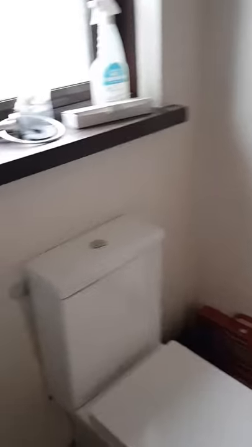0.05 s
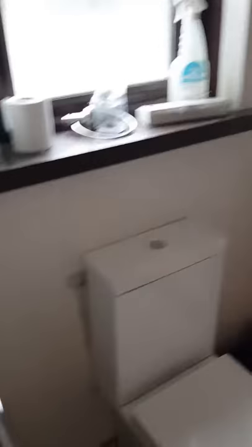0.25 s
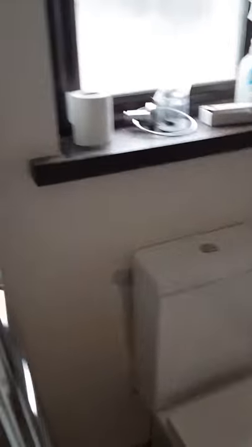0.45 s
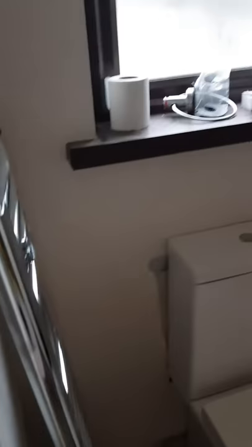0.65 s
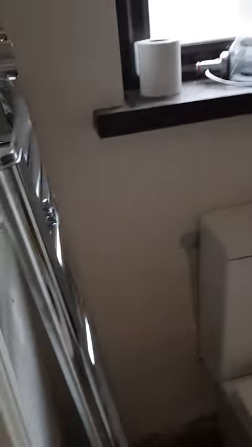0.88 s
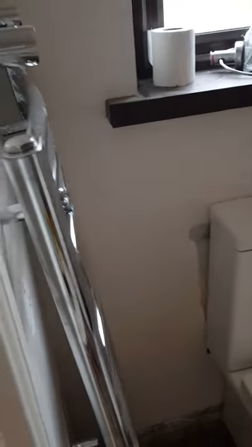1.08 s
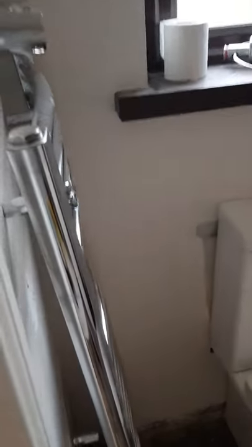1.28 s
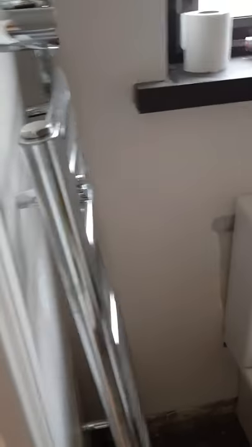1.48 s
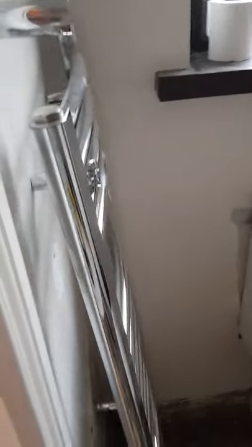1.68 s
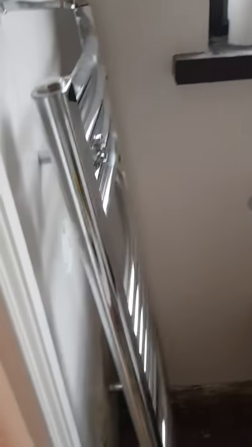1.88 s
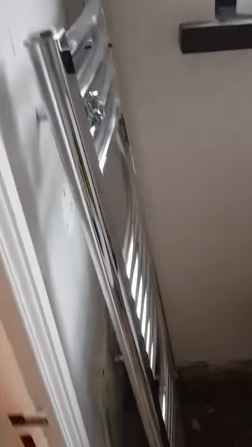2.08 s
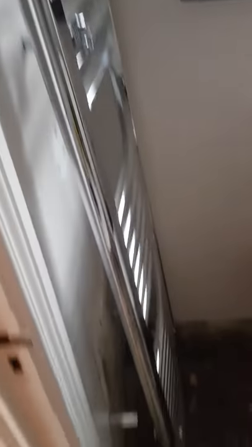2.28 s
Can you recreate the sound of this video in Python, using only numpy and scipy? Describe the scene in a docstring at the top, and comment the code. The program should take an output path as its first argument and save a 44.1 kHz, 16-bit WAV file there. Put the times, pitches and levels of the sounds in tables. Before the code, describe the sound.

Hard knocks on wood ring in a small bathroom, four and then two more.

```python
"""A small bare bathroom rings with hard knocks on wood, perhaps a door or a wall panel.
Every blow wakes the same wood resonances and wall echoes, with a fresh crack on top; standing waves
and a diffuse tail ring on for half a second. Between the knocks come light taps, soft footfalls and
the rustle of someone moving, over quiet room tone and a faint hum."""
import sys
import numpy as np
from scipy import signal
from scipy.fft import rfft, irfft
from scipy.io import wavfile
from scipy.ndimage import uniform_filter1d

SR = 44100
rng = np.random.default_rng(int(sys.argv[2]) if len(sys.argv) > 2 else 0)


def to_wav(sig):
    """Store sig (one row per channel, or 1-D mono) as 16-bit WAV at the path in sys.argv[1].

    Samples outside -1..1 are clipped; the rate is SR.
    """
    pcm = np.clip(np.atleast_2d(sig), -1, 1) * 32767
    pcm = np.round(pcm).astype(np.int16)
    wavfile.write(sys.argv[1], SR, pcm.T)  # frames by channels


N = 108045
RING = SR * 2 // 3   # samples that one hit is given to ring out
AGE = np.arange(RING) / SR   # seconds since the hit


def from_db(db):
    """Decibels to gain."""
    return 10 ** (np.asarray(db) / 20)


def decay(t60_s, age=AGE):
    """Envelope that falls 60 dB in t60_s."""
    return from_db(-60 * age / t60_s)


def attack(rise_s):
    """Envelope that rises from silence towards 1."""
    return 1 - np.exp(-AGE / rise_s)


def at_hz(points, hz):
    """Read a table on a log-frequency axis."""
    f, value = np.transpose(points)
    return np.interp(np.log(np.maximum(hz, 1)), np.log(f), value)


def pan(db):
    """Stereo gains for a level difference; positive leans left."""
    return from_db(np.array([[.5], [-.5]]) * db)


def butter(x, hz, kind, order=1):
    """Causal Butterworth filter."""
    return signal.sosfilt(signal.butter(order, hz, kind, fs=SR, output="sos"), x)


def add(out, start_s, sound):
    """Mix a sound in at a time."""
    i = max(int(start_s * SR), 0)
    out[..., i:i + sound.shape[-1]] += sound[..., :out.shape[-1] - i]


def steady(noise, window_s=.03):
    """Even out the slow swells of a noise."""
    power = uniform_filter1d(np.mean(noise ** 2, axis=0), int(window_s * SR))
    return noise * np.sqrt(power.mean() / (power + 1e-14))


def shelves(x, bass_db, treble_db, bass_hz=300, treble_hz=4500):
    """Bass and treble shelves: the weight and hardness of a contact."""
    x = x + (from_db(bass_db) - 1) * butter(x, bass_hz, "low")
    hardness = from_db(treble_db / 2)
    for _ in range(2):
        x = hardness * x + (1 - hardness) * butter(x, treble_hz, "low")
    return x


def room_noise(spectrum, size):
    """Coloured noise of rms 1 with the stereo image of the room."""
    # stereo width: (frequency [Hz], left-right correlation [-1..1])
    likeness = [(60, 0.89), (150, 0.91), (280, 0.95), (500, 0.48), (900, -0.083), (1400, -0.17),
                (2200, 0.14), (4000, -0.053), (12000, -0.095)]
    # stereo lean: (frequency [Hz], left minus right [dB])
    balance = [(125, 1.5), (250, -1.5), (500, 2.6), (1000, -3.2), (2000, 0), (4000, 4.4), (8000, 0.6),
               (13000, 0)]
    hz = np.arange(size // 2 + 1) * SR / size
    mid, side = rfft(rng.standard_normal((2, size)))
    alike = at_hz(likeness, hz)
    stereo = np.sqrt(1 + alike) * mid + np.sqrt(1 - alike) * side * [[1], [-1]]
    colour = from_db(at_hz(spectrum, hz)) * (hz > 20)
    noise = irfft(stereo * colour * pan(at_hz(balance, hz)), size)
    return noise / noise.std()


def room_tone(level_db=-65):
    """The quiet of the room: a low rumble under thin hiss."""
    # noise floor: (frequency [Hz], relative density [dB])
    floor = [(25, -17), (70, 7), (150, -4), (400, -5), (900, -33), (2000, -10.5), (5000, -20.5),
             (13000, -21), (16000, -17)]
    return from_db(level_db) * room_noise(floor, N)


def hum(hz=420, level_db=-72.5):
    """One faint, steady tone."""
    return from_db(level_db) * np.sin(2 * np.pi * hz * np.arange(N) / SR)


def rustles(t60_s=0.34):
    """Soles rub and scuff, cloth hisses: each move swells, then dies away in the room."""
    # moves: (start [s], swell [s], rub [dB], scuff [dB], hiss [dB])
    moves = [(-0.05, 0.076, -56.5, -65, -92), (0.074, 0.029, -51.5, -64.5, -58),
             (0.14, .04, -56, -80, -64.5), (0.461, .06, -41.5, -46, -55), (0.988, 0.1, -64, -66, -59.5),
             (1.09, .075, -56, -52, -52.5), (1.16, .045, -71.5, -65, -54.5), (1.201, 0.061, -60, -47, -55),
             (1.26, 0.016, -70, -55.5, -62), (1.457, 0.019, -64, -61, -59),
             (1.52, 0.014, -67.5, -71, -63.5), (1.79, 0.054, -61, -46, -57),
             (2.08, 0.094, -49.5, -49.5, -83), (2.37, 0.028, -52, -49, -69), (2.42, 0.02, -52, -54, -67)]
    # dull rub, midrange scuff, bright hiss: (frequency [Hz], relative density [dB])
    rub = [(40, -11.5), (100, -13), (200, 2), (450, 1.5), (700, -9.5), (1200, -9), (3000, -34),
           (16000, -56.5)]
    scuff = [(100, -18.5), (500, -19), (900, -7), (1400, 2), (2100, 5), (3000, -7), (5000, -14.5),
             (9000, -34.5), (16000, -50)]
    hiss = [(500, -12), (2000, -4), (4500, 4.5), (7000, -3.5), (9000, 0), (13000, -6.5), (16000, -12.5)]
    t, powers = np.arange(N) / SR, 0
    for start, swell, *levels_db in moves:
        rise = np.clip((t - start) / swell, 0, 1)
        fall = decay(t60_s, np.maximum(t - start - swell, 0))
        powers = powers + np.outer(from_db(levels_db), rise * fall) ** 2
    return sum(np.sqrt(power) * room_noise(colour, N) for power, colour in zip(powers, (rub, scuff, hiss)))


def footfalls(width_octaves=0.94, board_db=10):
    """Dull bumps on the floor, each booming briefly around its own pitch."""
    # soft steps: (time [s], level [dB], pitch [Hz])
    steps = [(0.075, -42.5, 155.7), (0.127, -47.5, 201), (1.143, -44.5, 174), (1.152, -46, 288),
             (1.168, -48.5, 215), (1.477, -39, 145), (1.553, -53, 178), (1.584, -54.5, 150)]
    out, hz = np.zeros((2, N)), np.geomspace(20, 16000, 40)
    for start, db, pitch in steps:
        hump_db = -40 * np.log10(1 + (np.log2(hz / pitch) / width_octaves) ** 2)
        boom = steady(room_noise(np.c_[hz, hump_db], RING)) * decay(t60_s=0.33)
        board = from_db(board_db) * np.sin(2 * np.pi * pitch * AGE) * decay(t60_s=0.077)
        add(out, start, from_db(db) * (board + boom) * attack(rise_s=0.0047))
    return out


def reverberation(high, split_hz=1150):
    """Diffuse tail, each band dying at its own rate: either its high crack or its low boom."""
    # colour of the tail: (frequency [Hz], relative density [dB])
    colour = [(30, -22), (70, -12.5), (120, -9), (200, -1), (320, -1.5), (450, -3), (630, -1.5), (1000, -3),
              (1600, -10.5), (2300, -11.5), (3200, -18), (5000, -25), (8000, -29.5), (13000, -37),
              (16000, -50.5)]
    # reverb time: (frequency [Hz], t60 [s])
    t60s = [(60, 0.58), (160, 0.37), (420, 0.48), (1100, 0.47), (2500, 0.44), (5000, 0.47), (8000, 0.37),
            (14000, 0.38)]
    spectrum = rfft(room_noise(colour, RING))
    hz, centres = np.arange(RING // 2 + 1) * SR / RING, np.geomspace(60, 15000, 17)
    tail, undamped = 0, 0
    for centre, pick in zip(centres, np.eye(len(centres))):
        if (centre > split_hz) == high:
            band = steady(irfft(spectrum * np.interp(hz, centres, pick), RING))
            tail = tail + band * decay(at_hz(t60s, centre))
            undamped = undamped + band
    return tail / undamped.std() * attack(rise_s=0.00224)


def standing_waves(delay_s=0.00805, scatter_db=0.5, longest_t60_s=.55):
    """Low room modes ring once the first echoes have crossed; each knock feeds them a little unevenly."""
    # room modes: (frequency [Hz], level [dB], t60 before the cap [s], left minus right [dB])
    modes = [(53.6, -55, 0.42, 3.5), (74.5, -33.5, 0.24, 1.5), (95.4, -58.5, 0.33, -5),
             (145.15, -31.5, 0.37, -0.5), (205, -35, 0.43, -0.5), (216.8, -34, 0.33, 0),
             (255, -29.5, 0.31, 4), (291.7, -36, 0.594, 6), (368, -30.5, 0.41, -5), (451, -29, 0.47, -7.5),
             (482.3, -28.5, 0.33, -10.5), (490, -52.5, 0.48, -10), (631, -26, 0.39, 12.5),
             (678, -28, 0.39, 3.5), (704, -40, 0.87, 3), (751.5, -42, 0.67, 4), (856, -38, 0.33, 26.5)]
    age, out = np.maximum(AGE - delay_s, 0), 0
    for hz, db, t60, side_db in modes:
        gain = pan(side_db) * from_db(db + scatter_db * rng.standard_normal())
        out = out + gain * decay(min(t60, longest_t60_s), age) * np.sin(2 * np.pi * hz * age)
    return out


def wood_thud(gain_db=18, band_hz=(55, 2960)):
    """The struck wood's dull thud, heard directly and off the nearest walls."""
    # sound paths, the panel's back radiating inverted: (delay [s], gain [ratio], left ear's lead [s])
    paths = [(0.0, -0.43, -.0002), (0.0045, 0.8, 0.0), (0.0076, -0.13, 0.0001), (0.0094, 0.95, -.0002),
             (0.0238, 0.0041, 0.0), (0.0269, -0.55, 0.0001), (0.0316, 0.25, 0.0), (0.0413, -0.14, 0.0)]
    # wood resonances: (frequency [Hz], bandwidth [Hz], level [dB])
    resonances = [(67.4, 19, 0), (150, 23, -7.5), (215, 53, 3), (387.5, 38, 3.5), (495, 72, 8.5),
                  (660, 18, 1), (850, 150, -13.5), (1157, 83, -6.5), (2154, 320, -6)]
    clicks, thud = np.zeros((2, RING)) + 1e-18, 0
    for delay, gain, lead in paths:
        for ear, arrival in zip(clicks, (delay - lead / 2, delay + lead / 2)):
            add(ear, arrival, np.array([gain]))
    for hz, width, db in resonances:
        radius = np.exp(-np.pi * width / SR)
        feedback = [1, -2 * radius * np.cos(2 * np.pi * hz / SR), radius ** 2]
        ringing = (1 - radius ** 2) / 2 * signal.lfilter([1, 0, -1], feedback, clicks)
        thud = thud + from_db(db) * ringing
    return from_db(gain_db) * butter(thud, band_hz, "band", order=2)


def snap(gain_db=-19, pan_db=-4):
    """The first few milliseconds of hard contact: a bright burst of noise."""
    # colour of the contact: (frequency [Hz], relative density [dB])
    colour = [(400, -21), (800, -9), (1400, -1), (2300, 8.5), (3200, -13), (4300, -3.5), (7000, -17),
              (13000, -18), (16000, -30)]
    envelope = attack(rise_s=0.00071) * decay(t60_s=0.021)
    return from_db(gain_db) * pan(pan_db) * room_noise(colour, RING) * envelope


def knocks(boom_db=-19, high_tail_db=-22, touch_lead_s=0.0016, touch_db=-11.5):
    """All knocks land on one spot of the wood, so they share a body; the crack is new each time."""
    # heavy knocks and light taps: (time [s], level [dB], bass [dB], crack [dB], treble [dB], snap [dB])
    blows = [(0.0686, -30, -0.5, -20.5, -8, -6), (0.195, -33.5, 6, 1, -3, -17),
             (0.2208, -5.5, -4.5, 3, -2.5, -3), (0.2968, -0.5, 3.5, -2, 2.5, 2),
             (0.5434, -1, 3.5, 0.5, 0.5, 4), (0.7973, 0, 2, 1.5, -14, 5), (0.935, -31, -13, 11, 0, 1),
             (1.145, -30, -2, 3, -4, 1), (1.6374, -35.5, 1, 3.5, 10.5, 0), (1.6574, -18, -1, 5, 6.5, -1.5),
             (1.6699, -2, 5, -1.5, -2, -1.5), (1.8711, 0, 4.5, 0, -2, 4), (2.309, -40.5, 0.5, -2.5, -7, 4),
             (2.388, -30.5, -12, -3, 1, 4.5)]
    out = np.zeros((2, N))
    body = wood_thud() + from_db(boom_db) * reverberation(high=False)
    for start, db, bass_db, crack_db, treble_db, snap_db in blows:
        crack = from_db(snap_db) * snap() + from_db(high_tail_db) * reverberation(high=True)
        blow = body + standing_waves() + from_db(crack_db) * crack
        add(out, start, from_db(db) * shelves(blow, bass_db, treble_db))
        touch = butter(snap(), 3000, "low")   # a faint first contact just ahead of the blow
        add(out, start - touch_lead_s, from_db(db + crack_db + touch_db) * touch)
    return out


def scene():
    """Knocks and movement over a faint hum and the quiet of the room."""
    return knocks() + hum() + footfalls() + rustles() + room_tone()


def record(dry):
    """A steep low-pass cuts the air above 16 kHz."""
    return signal.sosfilt(signal.ellip(10, .2, 80, 16000, fs=SR, output="sos"), dry)


dry = scene()
out = record(dry)
to_wav(out)
```